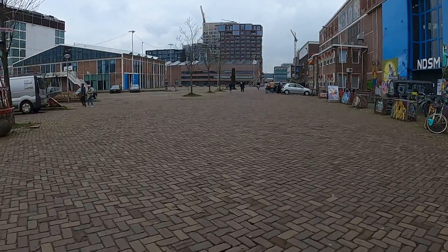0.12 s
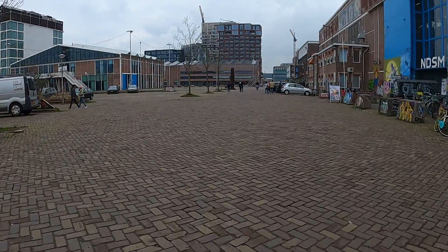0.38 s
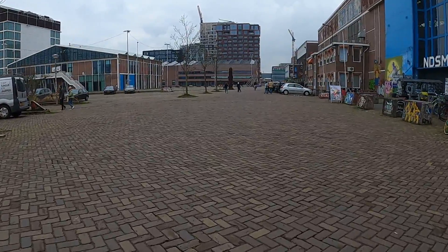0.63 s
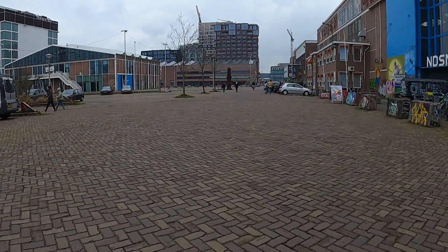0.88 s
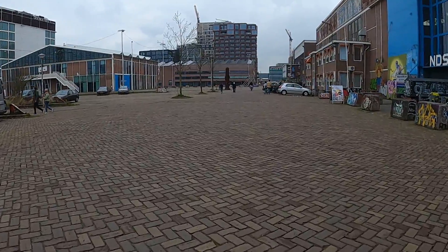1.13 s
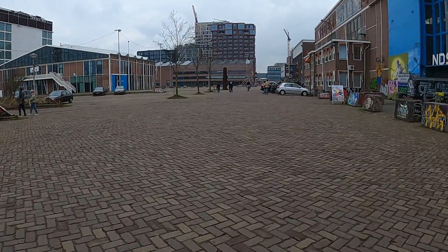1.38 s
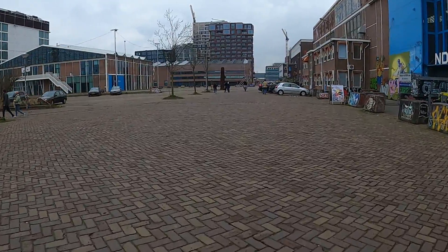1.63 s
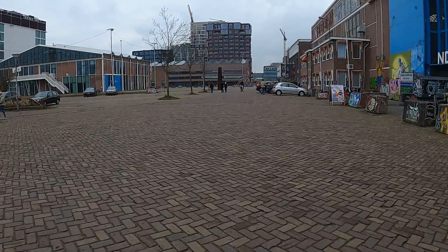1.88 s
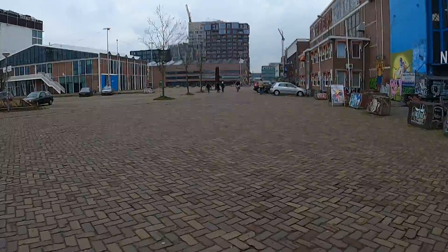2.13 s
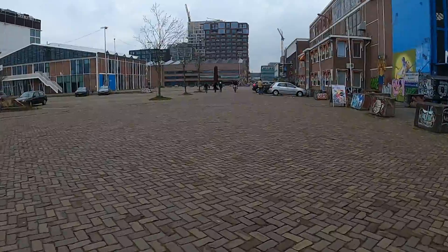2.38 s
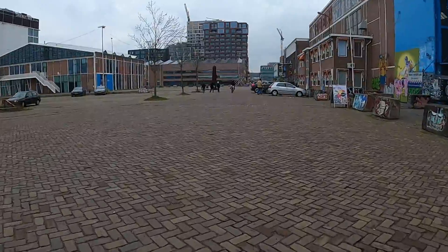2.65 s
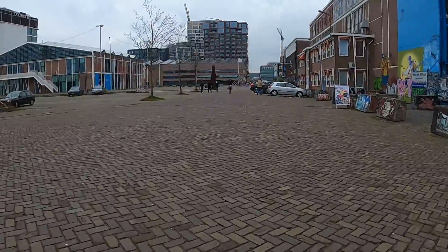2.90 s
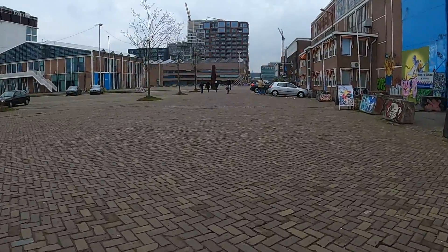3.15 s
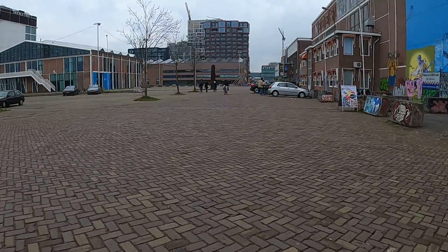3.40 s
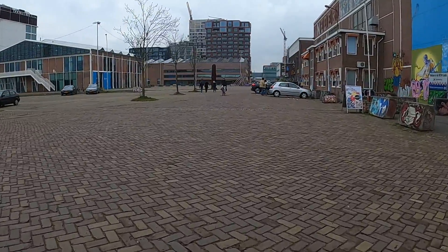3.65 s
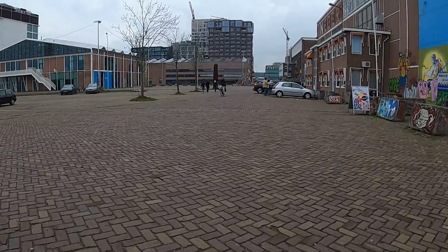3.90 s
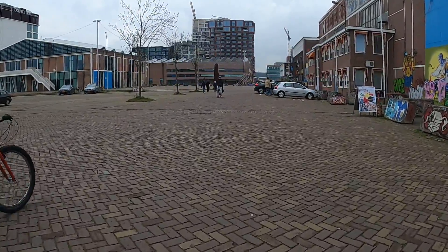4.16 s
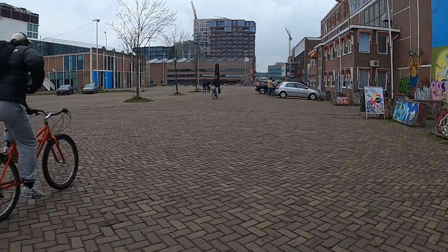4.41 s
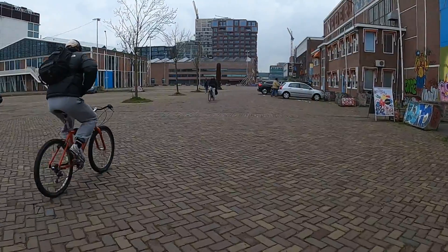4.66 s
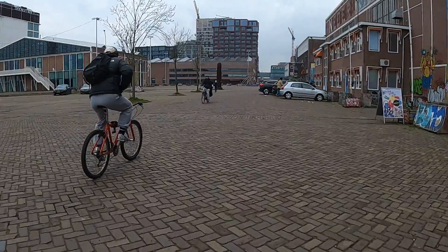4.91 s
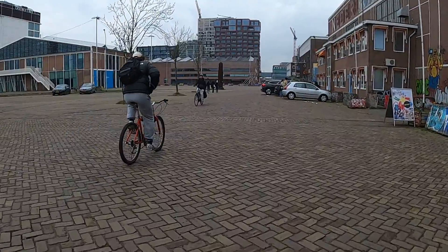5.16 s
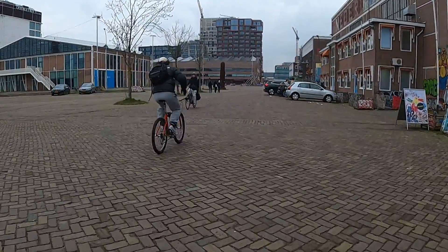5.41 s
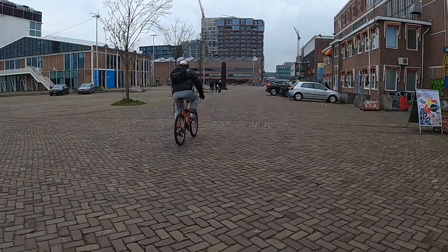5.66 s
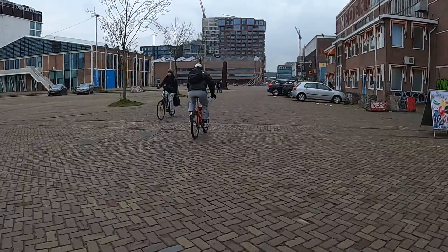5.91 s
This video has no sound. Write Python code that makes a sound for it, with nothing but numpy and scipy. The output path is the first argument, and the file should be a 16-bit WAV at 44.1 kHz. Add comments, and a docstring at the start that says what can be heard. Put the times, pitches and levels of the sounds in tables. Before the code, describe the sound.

A steady ride across bricks with low gusting wind, a faint wavering tyre hum, rattling knocks, and another bicycle overtaking with a gritty roar.

```python
"""Wind buffets and flutters, a tyre hums, loose parts rattle and tick, and a bicycle overtakes and draws away.
The place is a brick-paved square, heard from one microphone riding on a moving wheeled vehicle.
Wind, rolling, rattle, a high fizz and the bicycle are coloured noise; uneven jolts shake all but the wind.
The hum is a sine of wandering pitch, ticks are damped modes, grit makes short pings,
and the few very high squeaks are brief rising tones."""
import sys
import numpy as np
from scipy import signal
from scipy.fft import rfft, irfft, next_fast_len
from scipy.io import wavfile
from scipy.ndimage import uniform_filter1d, map_coordinates

SR = 44100
rng = np.random.default_rng(int(sys.argv[2]) if len(sys.argv) > 2 else 0)


def generate_wav(sig):
    """Save sig (samples, or channels by samples) to the path in sys.argv[1] as 16-bit PCM at SR."""
    pcm = np.round(np.clip(np.atleast_2d(sig).T, -1, 1) * 32767).astype(np.int16)
    wavfile.write(sys.argv[1], SR, pcm)


def ratio(d):
    """dB to gain"""
    e = np.asarray(d, float) / 20
    return 10 ** e


N = 266364

# Gusts at the microphone port: (time [s], buffet level [dB], flutter level [dB])
WIND_LEVELS = [(0.0, -29, -40), (0.05, -25, -26), (0.1, -24.5, -31), (0.135, -21, -20.5),
               (0.17, -19, -25.5), (0.22, -16.5, -34), (0.245, -30, -34), (0.27, -37, -27.5),
               (0.33, -27.5, -36.5), (0.38, -25, -29.5), (0.43, -29, -37), (0.475, -21, -43),
               (0.51, -27, -40), (0.55, -22, -23.5), (0.59, -26.5, -43), (0.7, -20.5, -32),
               (0.77, -20.5, -40), (0.82, -23.5, -32), (0.86, -27.5, -38), (0.92, -23.5, -31.5),
               (0.99, -23, -34), (1.02, -20, -32), (1.08, -28, -34.5), (1.87, -24, -40.5), (1.9, -25, -39),
               (1.93, -35, -46), (2.0, -23.5, -43), (2.05, -37, -39.5), (2.09, -20, -50),
               (2.12, -23.5, -26.5), (2.25, -26, -45), (2.29, -20.5, -28.5), (2.37, -15.5, -27.5),
               (2.52, -27.5, -37.5), (2.57, -27, -42), (2.61, -21, -33), (2.73, -23.5, -39),
               (3.09, -20.5, -37.5), (3.11, -28.5, -38), (3.3, -23.5, -34), (3.43, -23, -24.5),
               (3.46, -18, -31), (3.8, -28, -36.5), (3.83, -19, -29.5), (4.05, -32.5, -39.5),
               (4.16, -26.5, -31.5), (4.41, -28.5, -45.5), (4.44, -21, -39), (4.64, -34, -36),
               (4.67, -26.5, -40), (4.73, -21, -26), (4.84, -21.5, -34), (4.91, -13, -21), (4.98, -33, -49),
               (5.03, -18, -22), (5.21, -27, -37), (5.32, -18, -30.5), (5.37, -32, -40), (5.4, -19, -23),
               (5.45, -28.5, -37), (5.5, -15, -22), (5.55, -21.5, -27.5), (5.6, -15, -28), (5.63, -31, -38),
               (5.68, -21.5, -39), (5.74, -17.5, -24), (5.84, -25.5, -36.5), (5.94, -20.5, -30.5),
               (6.04, -13, -29.5)]
# Colour of the slow pressure swings: (frequency [Hz], relative density [dB per Hz])
BUFFET_COLOUR = [(12, -20.5), (22, -2), (42, 2), (58, 1), (80, -9.5), (130, -33), (250, -43.5)]
# Colour of the faster flutter: (frequency [Hz], relative density [dB per Hz])
FLUTTER_COLOUR = [(50, -10.5), (85, -1), (125, -2.5), (160, -10), (195, -23), (260, -30), (600, -58)]
# Ring of air in the tyre: (time [s], level [dB])
HUM_LEVEL = [(0, -42.5), (.2, -46), (.5, -55), (1.05, -37.5), (1.15, -40.5), (1.43, -35), (1.6, -39),
             (2.1, -35.5), (2.2, -32.5), (2.47, -33.5), (2.56, -40.5), (2.83, -32), (3.0, -39.5),
             (3.29, -28), (3.42, -37.5), (3.6, -35.5), (3.8, -47.5), (4.0, -38), (4.15, -45.5),
             (4.45, -40.5), (4.52, -37), (4.58, -27.5), (4.68, -49), (4.82, -33), (4.9, -48.5), (5.0, -36),
             (5.28, -54), (5.5, -36), (5.76, -45), (5.9, -32), (6.04, -44)]
# Middle pitch of that ring, drifting with load: (time [s], frequency [Hz])
HUM_PITCH = [(0, 227.5), (1.1, 234), (1.9, 227.7), (2.3, 230.1), (2.7, 238.3), (3.3, 238.3), (3.7, 232),
             (4.6, 233.9), (5.4, 231.5), (6.04, 238.4)]
# Tread on brick: (time [s], level [dB])
TREAD_LEVEL = [(0, -42.5), (.8, -40), (2.3, -38), (4.66, -38.5), (4.73, -33.5), (4.84, -35), (4.9, -40),
               (6.04, -43)]
# Rattle of shaken parts, and a high fizz from the ride and, later, the passing bicycle;
# before the lifts in ride(): (time [s], rattle level [dB], fizz level [dB])
RATTLE_FIZZ_LEVELS = [(0, -64.5, -87), (.45, -66, -84.5), (.9, -71.5, -98), (1.12, -70, -95),
                      (1.2, -67, -86), (1.38, -64, -85), (1.47, -64, -81), (1.72, -68.5, -88),
                      (2.03, -68.5, -90), (2.25, -66.5, -84), (2.3, -55.5, -81), (2.345, -57.5, -73),
                      (2.38, -64.5, -80), (2.5, -67.5, -96), (2.9, -64, -88), (3.3, -72, -86),
                      (3.5, -67, -79), (3.7, -65.5, -86), (4.24, -57, -73.5), (4.65, -58.5, -73),
                      (4.95, -62, -74), (5.35, -65.5, -77.5), (6.04, -64, -80.5)]
# Colour of the tread noise: (frequency [Hz], relative density [dB per Hz])
ROLLING_COLOUR = [(120, -13), (200, 0), (235, 5), (270, -1.5), (400, -8), (700, -15), (1200, -21.5),
                  (2000, -34), (4000, -43.5), (8000, -47.5), (16000, -83)]
# Colour of the rattling parts: (frequency [Hz], relative density [dB per Hz])
RATTLE_COLOUR = [(1000, -17), (2500, 2.5), (4000, 1), (6000, -2), (8700, -11.5), (9300, -29), (12000, -31),
                 (15400, -59)]
# Colour of the high fizz, from the ride and, later, the bicycle: (frequency [Hz], relative density [dB per Hz])
FIZZ_COLOUR = [(5000, -16), (8500, 0.5), (10000, -4), (13000, -10), (14600, -17), (15400, -46.5)]
# Knocks of loose parts, before the gains in ticks(): (time [s], level [dB], centre of brightness [Hz])
KNOCKS = [(0.063, -44, 3250), (0.2508, -43, 2600), (0.343, -45, 2300), (.13, -53, 4600), (.378, -47, 4600),
          (.4, -52, 4100), (0.6547, -45, 3270), (.676, -53, 3300), (.779, -50, 3300), (.826, -49, 4200),
          (0.89, -42, 2400), (.96, -48, 3000), (1.173, -45, 3000), (1.447, -46, 2800), (1.465, -43, 3380),
          (2.299, -50, 6900),  (2.589, -43.5, 3462), (2.914, -43, 4984), (3.119, -43, 2992),
          (3.141, -42, 4300), (3.405, -48, 7000), (3.507, -34, 2974), (3.693, -47, 6000),
          (3.794, -37, 2806), (3.8193, -43, 3000), (3.8355, -41, 7000), (3.838, -29, 3700),
          (3.862, -43, 6500), (3.875, -36, 2800), (3.9104, -44, 6780), (3.9535, -35, 2970),
          (4.073, -44, 2980), (4.1125, -35, 2816), (4.231, -43, 7600), (4.284, -42, 7530),
          (4.373, -34, 2820), (4.48, -41, 4270), (4.51, -44, 2600), (4.54, -41, 3300), (4.625, -31, 2610),
          (4.643, -35.5, 5400), (4.764, -41, 2760), (4.8, -40.5, 2803), (4.818, -31, 2798),
          (4.847, -39, 2980), (4.877, -37, 2000), (4.8905, -35, 2992), (4.984, -36, 4474),
          (5.2033, -37, 2980), (5.3437, -40, 4000), (5.436, -46, 3494), (5.463, -39.5, 3500),
          (5.819, -41.5, 5580)]
# Modes of the loose parts, before random variation: (frequency [Hz], relative level [dB])
PART_MODES = [(1700, 8), (2300, 7.5), (2800, 2), (3250, 2.5), (3700, 1.5), (4600, -1.5), (5450, 1.5),
              (6200, -2), (6900, -1.5), (7600, -1), (8400, -4.5)]
# Friction tones, before their envelope: (time [s], level [dB], starting pitch [Hz], length of fall [s])
SQUEAK_TONES = [(3.69, -66, 13400, .0075), (3.7434, -76, 13450, .0087), (4.168, -64, 13350, .0089),
                (5.043, -66, 13300, .008), (5.057, -52, 13170, .015)]
# Overtaking bicycle, before the gains in passer(): (time [s], roar level [dB], crackle level [dB])
PASSER_LEVELS = [(0, -50, -64.5), (.5, -54, -65.5), (1.2, -53, -59.5), (2.0, -50, -61.5), (2.2, -47.5, -56),
                 (2.5, -49, -59.5), (2.8, -43.5, -58.5), (3.2, -44.5, -48.5), (3.3, -41, -50),
                 (3.39, -45.5, -50.5), (3.43, -40.5, -45.5), (3.55, -42, -44.5), (3.64, -42.5, -46.5),
                 (3.7, -43, -43.5), (3.77, -43, -45.5), (3.98, -41.5, -46), (4.06, -40, -45),
                 (4.17, -39, -47), (4.25, -42, -49.5), (4.55, -40.5, -46), (4.87, -41, -44),
                 (5.03, -43.5, -47.5), (5.27, -42.5, -45.5), (5.42, -43.5, -49.5), (6.04, -47, -54)]
# Colour of the bicycle's tyre roar: (frequency [Hz], relative density [dB per Hz])
ROAR_COLOUR = [(150, -22), (350, 2.5), (550, -3.5), (1000, -4.5), (1600, -11), (2600, -20.5), (3800, -28),
               (5000, -37.5), (9000, -54.5), (14000, -64.5), (15400, -84)]
# Colour of its grit and chain: (frequency [Hz], relative density [dB per Hz])
CRACKLE_COLOUR = [(800, -18.5), (1800, 4), (2500, 3.5), (3900, -5), (4600, -12), (8700, -25.5),
                  (9500, -31.5), (14000, -48), (15400, -66.5)]


def unit(x):
    """Scaled to rms 1."""
    return x / np.sqrt(np.mean(x ** 2) + 1e-20)


def curves(rows):
    """One value per sample for each column after the time."""
    s, *columns = np.transpose(rows)
    return [np.interp(np.arange(N) / SR, s, column) for column in columns]


def wobble(rate):
    """A smooth random curve, rate knots a second."""
    knots = rng.standard_normal(int(N * rate / SR) + 9)
    return map_coordinates(knots, [np.arange(N) * rate / SR])


def rush(spectrum, patchy_db):
    """Noise of rms 1 with the given colour and patches of random gain in time and frequency."""
    z = signal.stft(rng.standard_normal(N + SR // 4), nperseg=1024)[2]
    field = uniform_filter1d(rng.standard_normal(z.shape), size=14, axis=0)
    field = uniform_filter1d(field, size=3, axis=1)
    x = signal.istft(z * ratio(patchy_db * unit(field)), nperseg=1024)[1]
    m = next_fast_len(len(x))
    f, db = np.transpose(spectrum)
    log_hz = np.log(np.fft.rfftfreq(m, 1 / SR) + 1)
    colour = ratio(np.interp(log_hz, np.log(f), db, left=-120, right=-120))
    return unit(irfft(rfft(x, m) * colour, m)[:N])


def evened(x, window_s, share):
    """Noise whose own chance swells are partly levelled out."""
    power = np.abs(signal.hilbert(x, next_fast_len(N))[:N]) ** 2
    power = uniform_filter1d(power, max(int(window_s * SR), 1))
    return unit(x / (np.abs(power) + 0.018) ** (np.clip(share, 0, 1) / 2))


def jolts(rate, spread_db, t60):
    """Envelope of rms 1: a wheel drops into joints at uneven moments, and each shake dies quickly."""
    draw = rng.random((1200, 3))
    at = (np.cumsum(.4 + 1.2 * draw[:, 0]) / rate * SR).astype(int)
    hits = np.bincount(at, ratio(spread_db * (draw[:, 1] + draw[:, 2])), N)[:N]
    t = np.arange(SR // 8) / SR
    shake = ratio(-60 * t / t60) * (1 - np.exp(-t / 0.0034))
    return unit(signal.fftconvolve(hits, shake)[:N])


def wind():
    """Slow pressure swings on the port follow the gusts, with a faster flutter on top; both come in lumps."""
    buffet_db, flutter_db = curves(WIND_LEVELS)
    lumps = wobble(17)
    buffet = evened(rush(BUFFET_COLOUR, patchy_db=-0.36), window_s=0.079, share=0.87)
    buffet = unit(ratio(1.5 * lumps) * buffet)
    flutter = evened(rush(FLUTTER_COLOUR, patchy_db=-1.7), window_s=0.063, share=0.78)
    flutter = unit(ratio(1.4 * lumps + 1.2 * wobble(22)) * flutter)
    return ratio(buffet_db) * buffet + ratio(flutter_db) * flutter


def tyre_hum():
    """The ring of air in the tyre, shaken at random: a sine blurred by wandering pitch and level."""
    level_db, = curves(HUM_LEVEL)
    pitch_hz, = curves(HUM_PITCH)
    pitch_hz = pitch_hz + 2.5 * wobble(9) + 3.5 * wobble(45)
    phase = 2 * np.pi * np.cumsum(pitch_hz) / SR
    swing = ratio(1.8 * wobble(22)) * (1.3 + .4 * wobble(30))
    return ratio(level_db) * unit(swing * np.sin(phase))


def ride():
    """Tread noise, rattle of shaken parts, and a high fizz from the ride and, later, the passing bicycle."""
    tread_db, = curves(TREAD_LEVEL)
    rattle_db, fizz_db = curves(RATTLE_FIZZ_LEVELS)
    shake = jolts(rate=52, spread_db=8.5, t60=0.073)
    patches = wobble(12)  # rougher moments of rattle and fizz
    rolling = unit(ratio(0.86 * wobble(7.7)) * (1 + 0.099 * shake) * rush(ROLLING_COLOUR, patchy_db=1.4))
    rattle = unit(ratio(1.3 * patches) * (1 + 0.69 * shake) * rush(RATTLE_COLOUR, patchy_db=2.0))
    fizz = unit(ratio(1.4 * patches) * (1 + .8 * shake) * rush(FIZZ_COLOUR, patchy_db=0.5))
    return ratio(tread_db) * rolling + ratio(rattle_db + 2.5) * rattle + ratio(fizz_db + 4.5) * fizz


def ticks():
    """Loose parts knock: each contact clicks in many modes and may leave a middle one ringing roughly."""
    ring_t60_s, ring_hz, ring_db = .045, 3500, -2  # modes near ring_hz ring on
    click_t60_s, click_db = .02, 1.5  # all modes click briefly
    out, t = np.zeros(N + SR), np.arange(SR // 8) / SR
    hz, mode_db = np.transpose(PART_MODES)
    from_ring = np.log2(hz / ring_hz)[:, None] ** 2
    for s, db, centre_hz in KNOCKS:
        octaves = np.log2(hz / centre_hz)[:, None]
        away = octaves ** 2
        gains = ratio(mode_db + 2 * rng.standard_normal(len(hz)))
        # Phase noise makes a dull ring, not a ping
        drift = np.cumsum(.09 * rng.standard_normal((len(hz), len(t))), axis=1)
        drift = uniform_filter1d(drift, size=24, axis=1)
        ringing = ratio(ring_db - 500 * away - 120 * from_ring - 60 * t / ring_t60_s)
        slope = np.where(octaves > 0, 15, 7)  # dB per squared octave
        click = ratio(click_db - slope * away - 60 * t / click_t60_s)
        knock = gains @ ((ringing + click) * np.sin(2 * np.pi * hz[:, None] * t + drift))
        rise = np.minimum(t / .0009, 1) ** 2
        out[round(s * SR):][:len(t)] += ratio(db - 11) * rise * knock
    return out[:N]


def squeaks():
    """Very high, brief friction tones that rise a little."""
    out, t = np.zeros(N + SR), np.arange(SR // 8) / SR
    for s, db, hz, length in SQUEAK_TONES:
        envelope = (1 - np.exp(-t / .002)) * np.exp(-(t / max(length, .003)) ** 2)
        tone = np.sin(2 * np.pi * (hz * t + 5000 * t ** 2))  # climbs 10 Hz each millisecond
        out[round(s * SR):][:len(t)] += ratio(db) * envelope * tone
    return out[:N]


def chips():
    """Grit pressed out of the joints: brief damped pings of scattered pitch and size, rms 1."""
    rate, middle_hz, spread_octaves = 240, 2600, .55  # rate in pings a second
    draw = rng.random((1500, 2))
    at = (np.cumsum(-np.log(1 - draw[:, 0])) / rate * SR).astype(int)
    hz = middle_hz * 2 ** (spread_octaves * rng.standard_normal((len(at), 1)))
    hz = np.clip(hz, 800, 4800)
    k = np.arange(SR // 30)
    cycles = hz * k / SR
    size = ratio(-3.5 * np.log(1.02 - draw[:, 1:]) - 6 * np.log2(hz / middle_hz))
    envelope = np.exp(-2 * cycles / 3) * (1 - np.exp(-cycles))
    ping = size * envelope * np.sin(2 * np.pi * cycles)
    return unit(np.bincount((at[:, None] + k).ravel(), ping.ravel(), N)[:N])


def passer():
    """The other bicycle: a roar of tyres, and a crackle of grit and chain broken into grains by quick jolts."""
    roar_db, crackle_db = curves(PASSER_LEVELS)
    shake = jolts(rate=45, spread_db=10.5, t60=0.078)
    grit = jolts(rate=140, spread_db=10, t60=.016)
    roar_shake = 1 + 0.22 * shake + 0.17 * grit
    roar = unit(ratio(0.81 * wobble(15)) * roar_shake * rush(ROAR_COLOUR, patchy_db=0.74))
    crackle = unit((1 + 1.3 * grit + .3 * shake) * rush(CRACKLE_COLOUR, patchy_db=1.5))
    grains = crackle + ratio(-2.5) * chips()
    return ratio(roar_db + 3.0) * roar + ratio(crackle_db - 2.55) * grains


def scene():
    """Everything reaches one microphone on the moving vehicle."""
    mix = wind() + tyre_hum() + ride() + ticks() + squeaks() + passer()
    return mix[None]


def roll_off(x):
    """The treble ends steeply here."""
    return signal.sosfilt(signal.butter(12, 15400, fs=SR, output="sos"), x)


def record(dry):
    """The single microphone's mix is kept in mono."""
    return roll_off(dry)


dry = scene()
out = record(dry)
generate_wav(out)
```